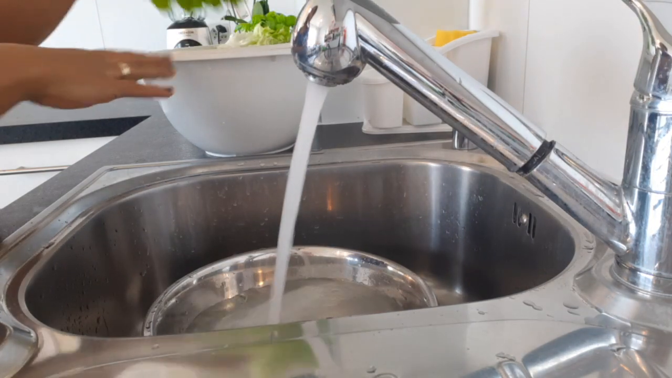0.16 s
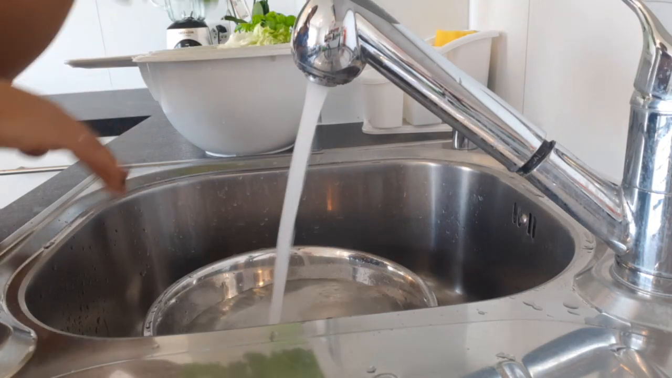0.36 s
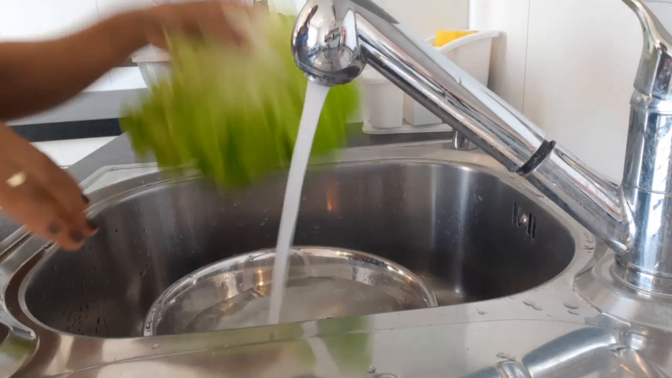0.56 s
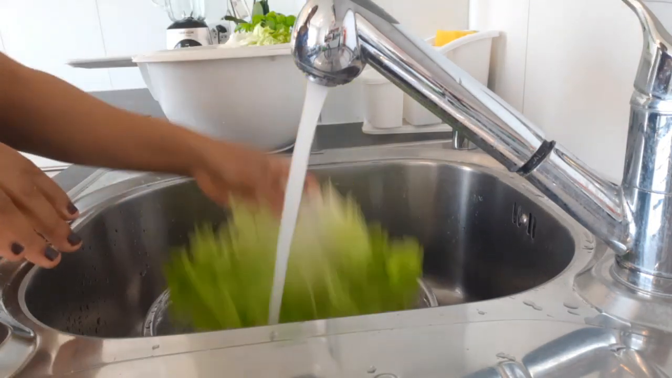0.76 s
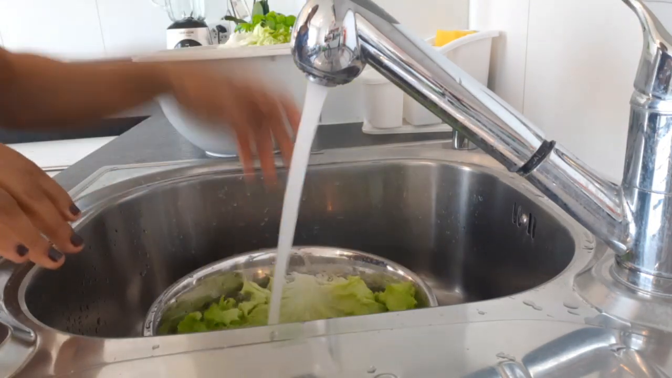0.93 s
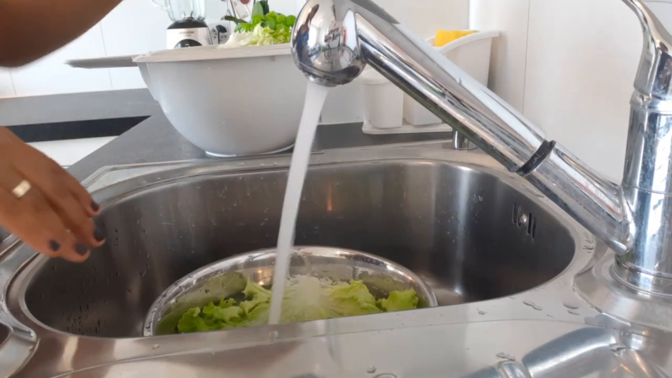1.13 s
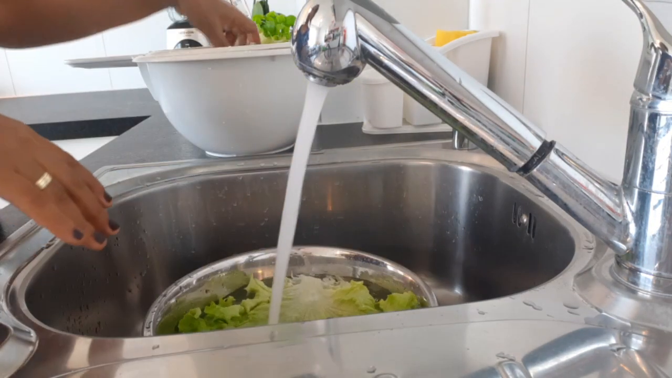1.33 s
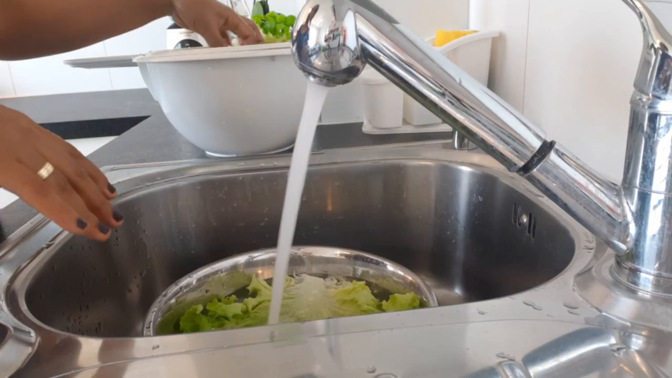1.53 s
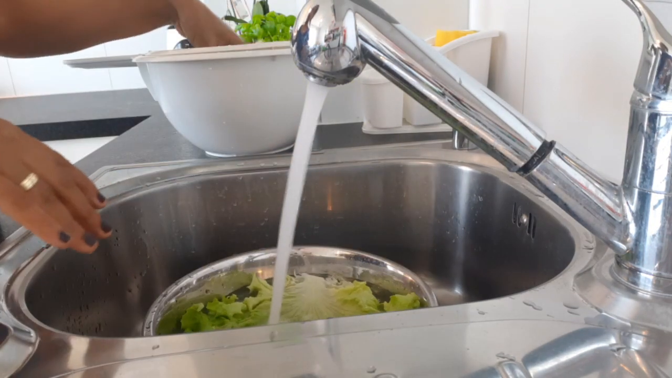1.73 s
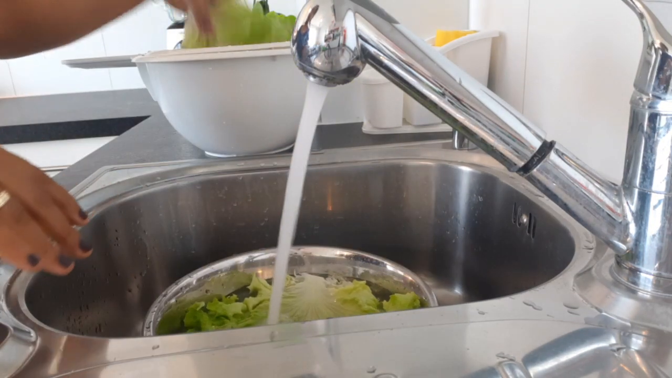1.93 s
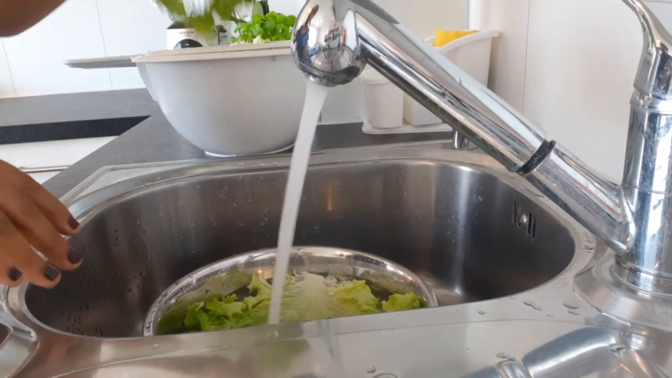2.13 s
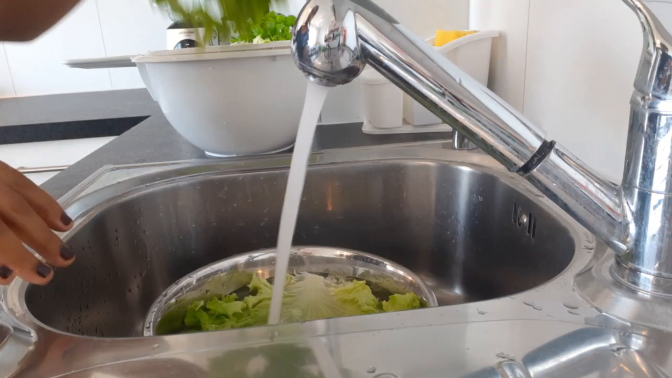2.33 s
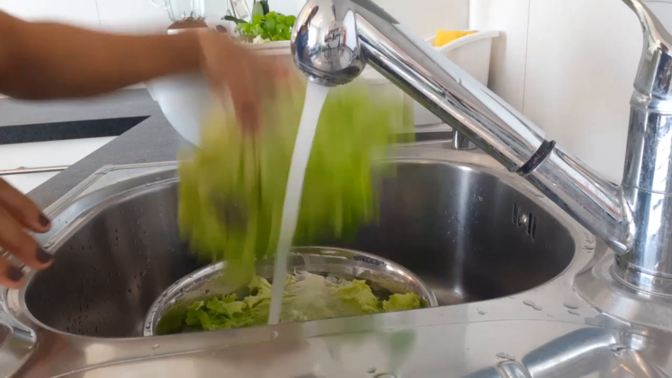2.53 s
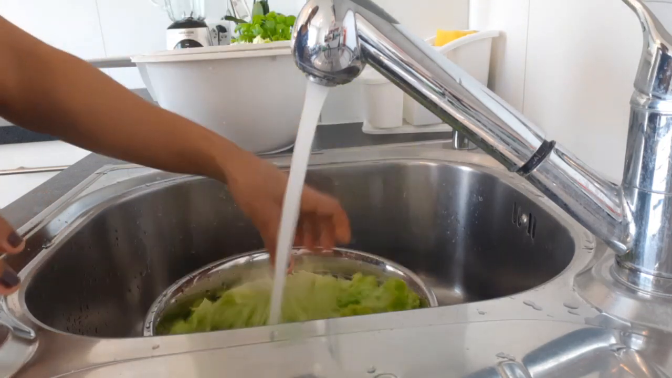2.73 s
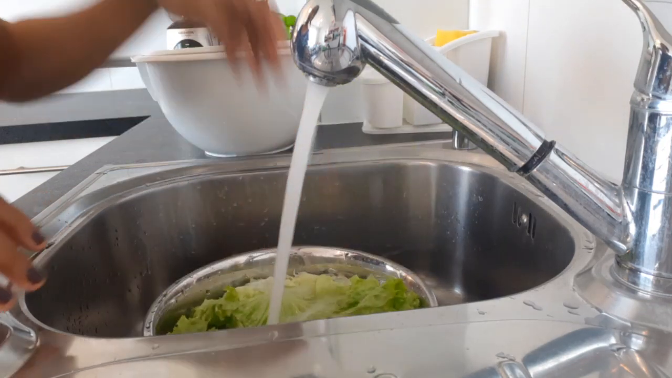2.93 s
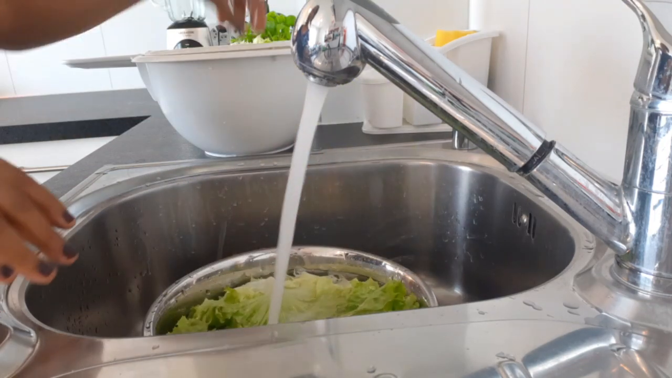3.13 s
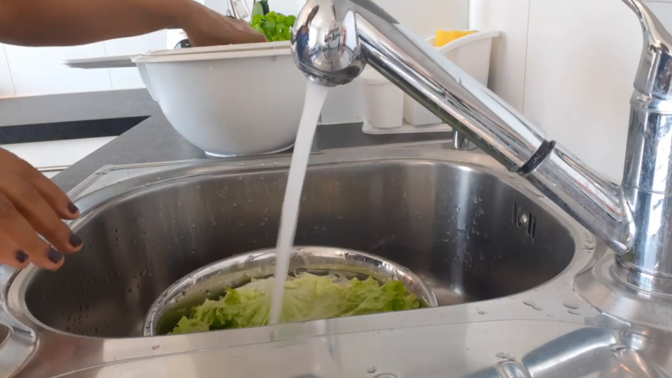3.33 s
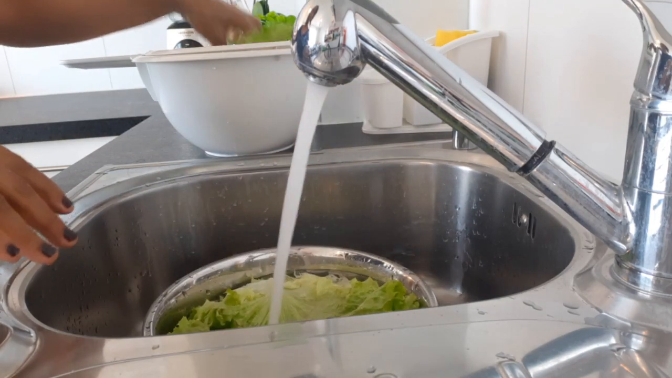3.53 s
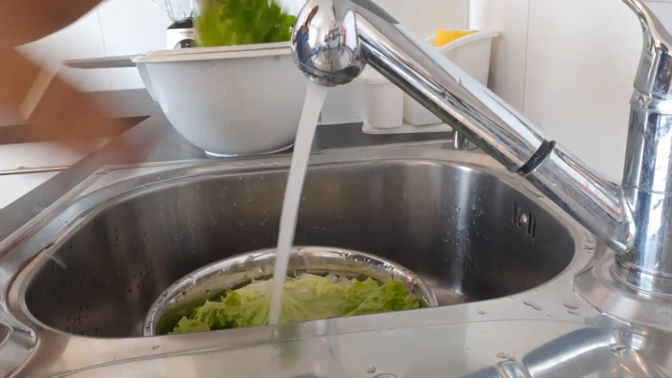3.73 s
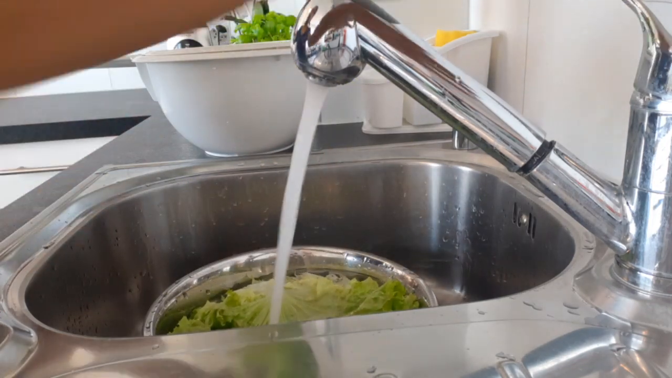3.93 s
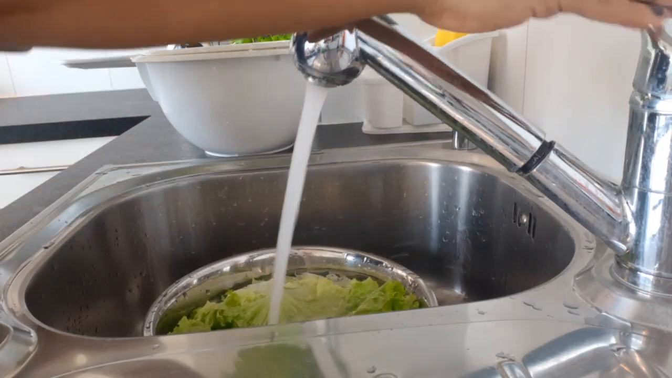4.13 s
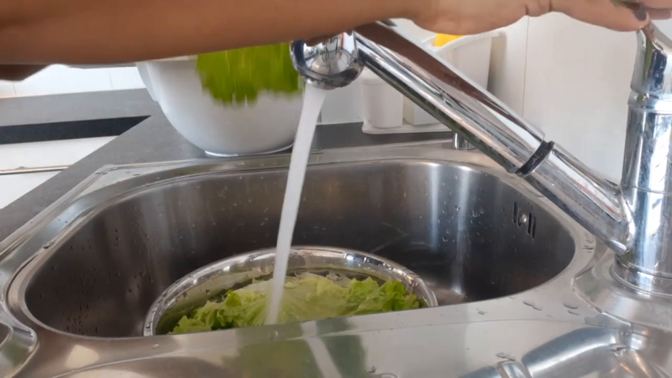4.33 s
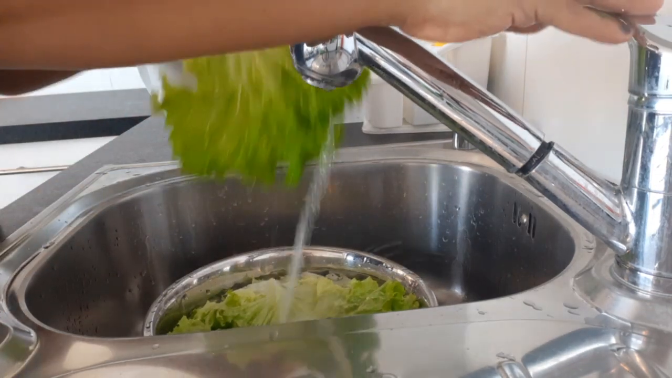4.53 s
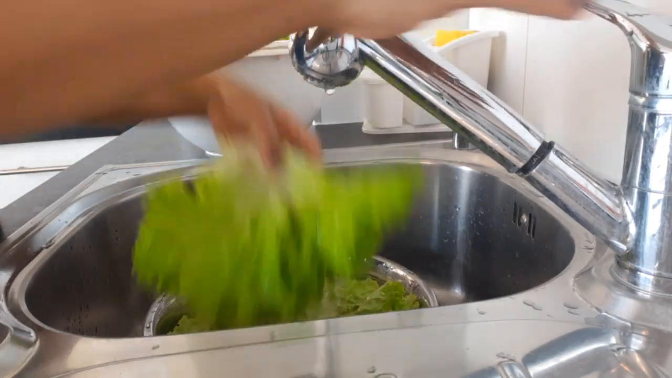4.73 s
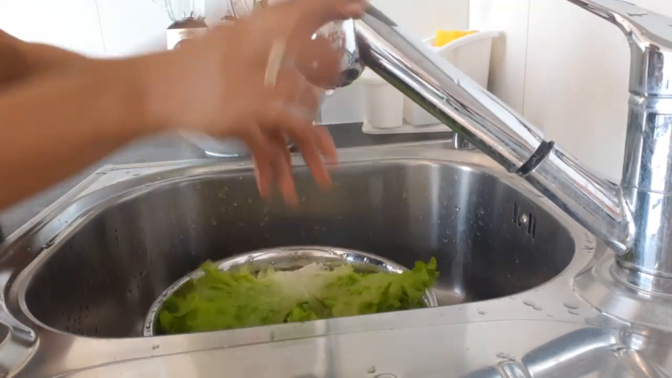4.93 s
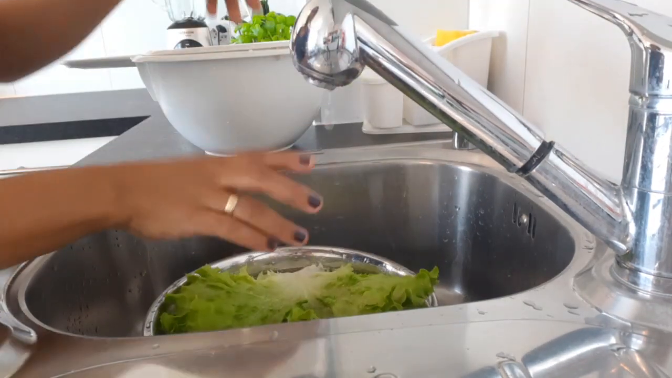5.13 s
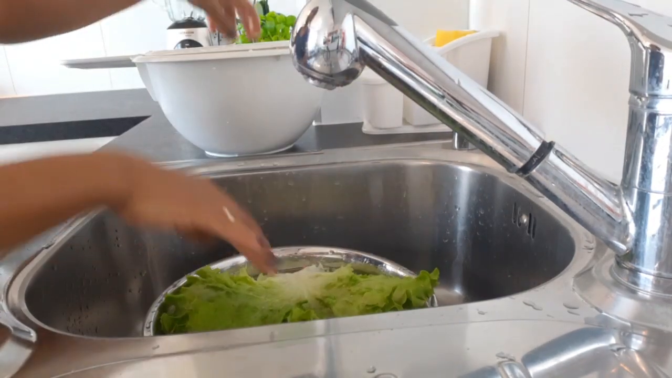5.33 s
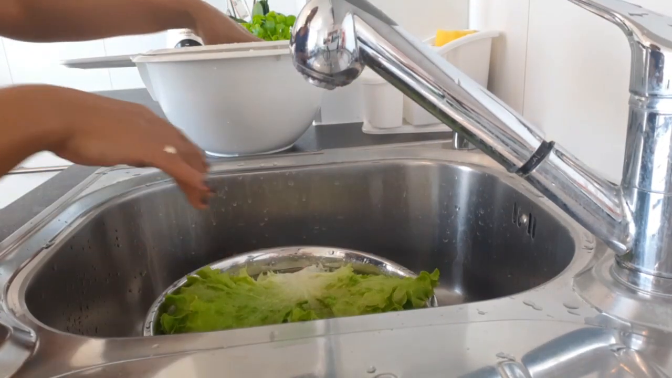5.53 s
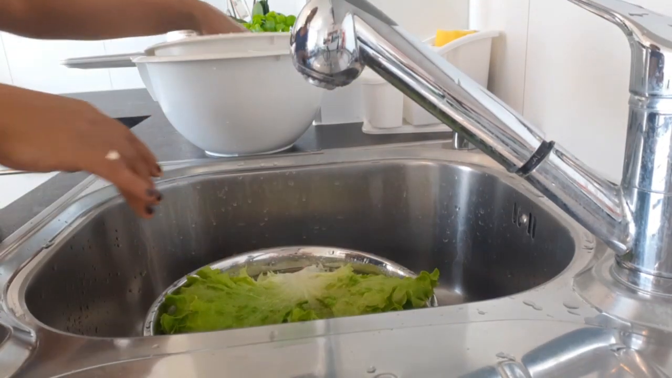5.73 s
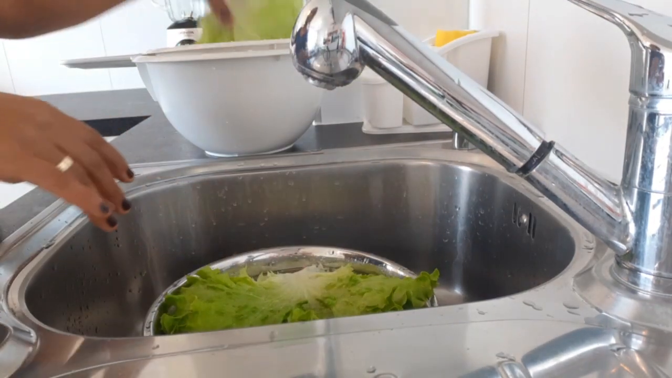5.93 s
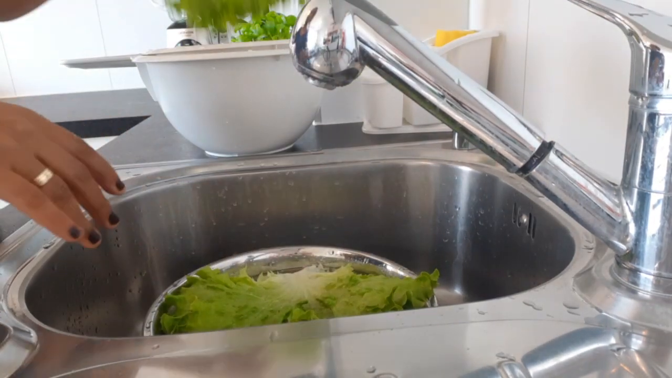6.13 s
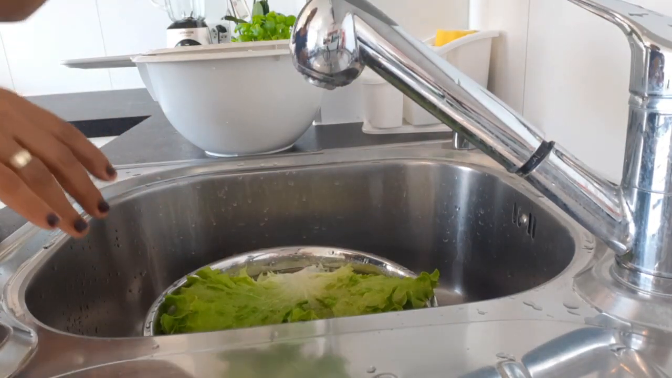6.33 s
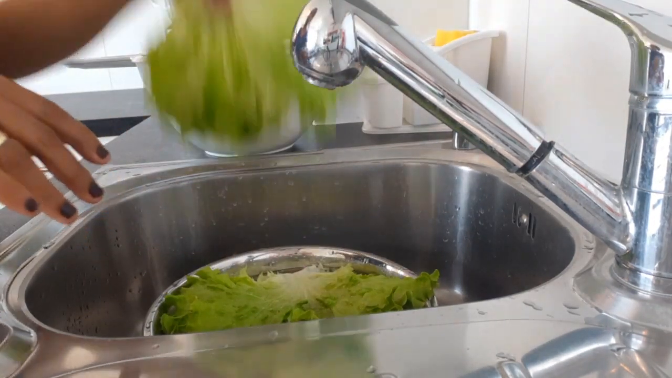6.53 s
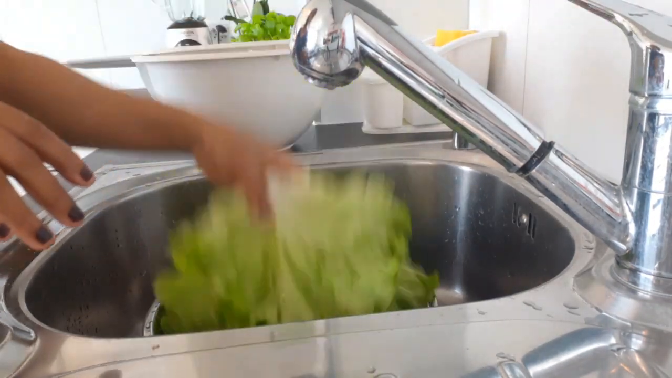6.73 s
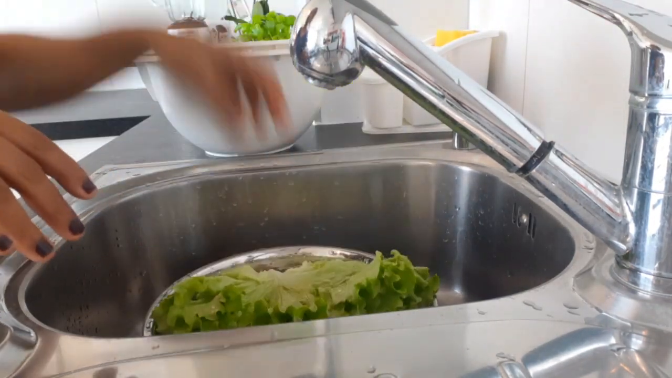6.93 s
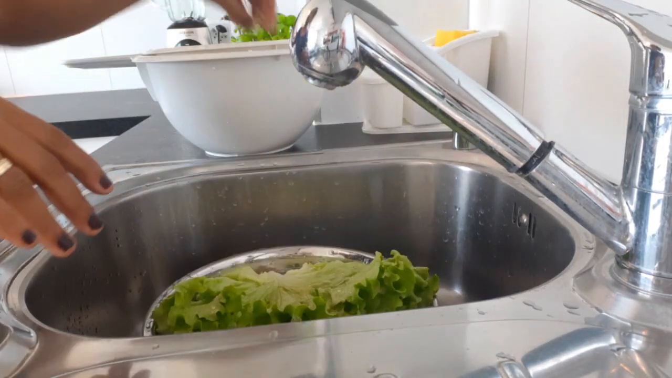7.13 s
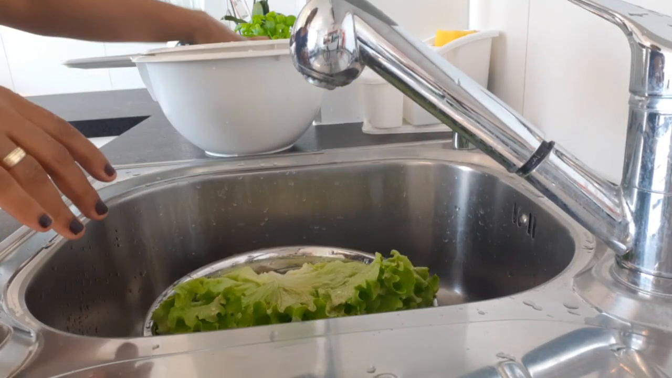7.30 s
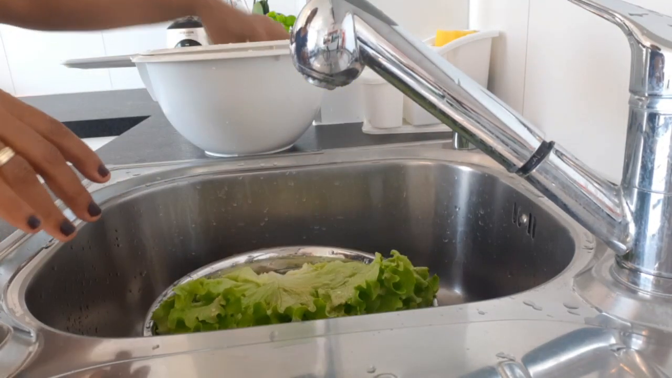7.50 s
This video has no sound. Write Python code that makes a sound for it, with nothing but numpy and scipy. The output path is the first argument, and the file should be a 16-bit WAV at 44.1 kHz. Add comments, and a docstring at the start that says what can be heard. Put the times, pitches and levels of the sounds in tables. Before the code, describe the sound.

Close hissing, gurgling tap water splashes over lettuce and stops with a dull thud, leaving hollow tub knocks and faint leafy crackles.

```python
"""First a tap is heard running hard into a bowl of water in a steel sink, close by: fizz, tinkling and gurgling.
Lettuce is lifted from a plastic tub and dropped under the jet, which then spatters on the leaves.
The lever is pushed shut with a thud; the hand goes on gathering wet leaves and the tub knocks on the worktop.
Water is filtered grains and short rising notes; leaves are crackling grains under swells; blows are ringing
modes and noise bursts. Echoes and a faint room floor lie behind, heard at two microphone ports."""
import sys
import numpy as np
from scipy import signal
from scipy.fft import rfft, irfft
from scipy.io import wavfile

SR = 44100
rng = np.random.default_rng(int(sys.argv[2]) if len(sys.argv) > 2 else 0)


def master_out(mix):
    """Clip the mix to full scale and print it as 16-bit PCM to the path in sys.argv[1]."""
    frames = np.transpose(np.atleast_2d(mix))
    ceiling = np.clip(frames, -1, 1)
    pcm = np.round(ceiling * 32767).astype(np.int16)
    wavfile.write(sys.argv[1], SR, pcm)


N = 337806
TIME = np.arange(N) / SR
COARSE_TIME = TIME[::32]   # slow controls are worked out on every 32nd sample

# All levels in dB are set at the source, before echoes and the microphone.
# where the jet lands: start_s, share_on_leaves (0-1)
JET_LANDING = [(0, 0.26), (.75, 0.17), (.95, 0.76), (1.3, 0.15), (2.62, 0.28), (2.72, 0.58), (2.92, 0.94),
               (4.0, 1)]
# the jet on open water: splash, bubbles, drumming on the basin, hollow note of the bowl (dB)
SPLASH_DB, GURGLE_DB, DRUM_DB, HOLLOW_DB = -38.5, -47, -45, -44
# what changes when it lands wholly on leaves (dB)
LEAF_SPLASH_GAIN_DB, LEAF_DRUM_LOSS_DB, LEAF_HOLLOW_LOSS_DB = 8.5, 5.5, 20.5
FILL_DB_PER_S = 2.5   # the hollow note grows as the bowl fills
WANDER_DB, WANDER_HZ = 0.19, 4.3   # the jet sways over the leaves, and its level with it
# fat drops on the leaves, against the spatter; tinkle, against the fizz; lone bubbles in the pool
PATTER_DB, TINKLE_DB, BLIP_DB = -11.5, -16, -53
# the lever is shut, the jet dies, and water trickles off the leaves
SHUT_S, SHUT_DB_PER_S = 4.53, 156
TRICKLE_DB, TRICKLE_DB_PER_S = -45.5, 48
# leaves shift under the jet and the water sloshes: start_s, length_s, spray_db, bubbles_db
SLOSHES = [(0.144, 0.0076, -54, -43), (0.572, 0.0073, -36.5, -39.5), (0.803, 0.04, -36.5, -55),
           (0.861, 0.12, -33, -44.5), (1.098, 0.094, -34.5, -63), (2.71, 0.082, -39, -43.5),
           (3.396, 0.012, -32, -48.5)]
SLOSH_RISE_DB_PER_S, SLOSH_FALL_DB_PER_S = 496.5, 204.5
# spectrum of the jet on the pool: frequency_hz, level_db (per Hz)
POOL_SPECTRUM = [(1060, -22), (1800, 1.5), (2300, -0.5), (2670, 2), (2900, -4), (4450, -3), (8130, -8),
                 (9420, 0), (13300, -2.5), (16000, -3.5)]
# spectrum of the jet on leaves: frequency_hz, level_db (per Hz)
SPATTER_SPECTRUM = [(1060, -36), (1800, -5), (2220, -9.5), (2600, 1), (3290, -5), (4140, -0.5), (6300, -4),
                    (7910, -5.5), (9770, -1.5), (13000, -4.5), (16000, -9)]
# spectrum of the drumming on the basin: frequency_hz, level_db (per Hz)
DRUM_SPECTRUM = [(30, -4.5), (55, -1.5), (85, -5), (120, -2), (160, 1), (200, 1), (235, -14), (300, -3.5),
                 (400, 2.5), (520, 1.5), (610, -1.5), (730, -4), (1000, -15.5), (1800, -33.5)]
# resonances of the basin that colour the water: frequency_hz, width_hz, level_db
BASIN_RESONANCES = [(114, 10, 11), (385, 32, 3), (618, 25, 6), (950, 16, 4), (1236, 6.9, 3.5),
                    (2725, 66, 2.5), (2850, 45, 0.5), (3120, 70, 6.5), (3490, 45, 6.5), (4050, 41, 1.5),
                    (4420, 100, 2), (4670, 36, 1.5), (5858, 40, -1.5), (6620, 90, 3), (7090, 90, 3)]
# pockets between the leaves, which open and close under the jet: frequency_hz, width_hz
LEAF_POCKETS = [(1200, 580), (2750, 500), (3500, 600), (4400, 800), (5400, 900), (6700, 1200)]
POCKET_SWING_DB, POCKET_HZ = 2, 11
# splashes and snapping leaves: start_s, level_db, pitch_hz
SPITS = [(0.484, -36, 4560), (0.586, -34, 10900), (0.778, -35.5, 4180), (0.795, -34.5, 1140),
         (0.826, -37.5, 1400), (0.875, -36.5, 1370), (0.884, -30, 4510), (0.932, -28, 5200),
         (0.94, -34, 2300), (0.942, -24, 9050), (1.034, -35.5, 4440), (1.1172, -35, 2680),
         (1.188, -35, 2820), (2.0123, -27.5, 9800), (2.293, -30, 9600), (2.677, -30.5, 1800),
         (2.724, -37.5, 1250), (2.751, -40, 1150), (2.878, -28, 6000), (3.023, -31.5, 4940),
         (3.0695, -27, 5240), (3.101, -30.5, 5160), (3.382, -33, 1600), (3.861, -30, 3080),
         (3.953, -28, 2820), (4.5754, -28.5, 4930), (4.785, -64, 1400), (4.868, -47, 1250),
         (4.889, -42, 1300), (4.897, -43.5, 6600), (5.046, -61, 11000), (5.2368, -62, 11200),
         (5.484, -41, 1950), (5.5, -51, 3800), (5.554, -47.5, 3000), (5.642, -47, 2900), (5.692, -48, 1500),
         (5.805, -51, 3500), (6.641, -58.5, 1002), (6.8117, -47, 9500), (6.858, -54, 1200),
         (6.996, -68, 11000), (7.1482, -63, 11440), (7.158, -65, 1400), (7.378, -53, 3900),
         (7.431, -55, 2610), (7.474, -52, 4200), (7.502, -50, 3870), (7.53, -52, 1817)]
# large bubbles and plops: start_s, level_db, pitch_hz
PLOPS = [(0.135, -27, 1230), (0.137, -31, 950), (0.343, -34, 1230), (0.582, -36.5, 1230),
         (0.829, -23.5, 1264), (0.829, -23.5, 1357), (0.873, -26, 1212), (1.033, -29, 1900),
         (1.389, -35, 1390), (5.553, -35, 860), (7.531, -45, 1640)]
# air glugs in the filling bowl: start_s, length_s, pitch_hz, level_db
GLUGS = [(0.06, 0.015, 286.3, -32), (0.09, 0.069, 207, -41), (0.245, 0.043, 614, -41),
         (0.28, 0.05, 290, -39.5), (0.595, 0.061, 279, -42), (0.755, 0.036, 300, -36),
         (0.93, 0.077, 424.4, -37), (1.08, 0.075, 552, -43), (1.365, 0.055, 348, -39)]
TONE_RISE_DB_PER_S, TONE_FALL_DB_PER_S = 904, 399   # glugs and squeaks alike

# the hand gathers leaves in the tub: start_s, length_s, rustle_db, tub_rubbing_db
GRABS = [(0.028, 0.15, -48, -42.5), (1.326, 0.051, -42.5, -40), (1.673, 0.13, -44.5, -40),
         (3.353, 0.32, -45.5, -46.5), (5.486, 0.014, -48.5, -45), (5.553, 0.011, -51.5, -47),
         (5.635, 0.012, -52.5, -41), (5.677, 0.23, -55.5, -48.5), (5.916, 0.14, -65, -44),
         (6.285, 0.12, -85, -61), (7.345, 0.2, -56.5, -55)]
GRAB_RISE_DB_PER_S, RUSTLE_FALL_DB_PER_S, RUB_FALL_DB_PER_S = 596.5, 141, 103
# a handful lands in the steel bowl: start_s, rustle_db, bowl_ring_db
LEAF_DROPS = [(0.829, -37.5, -43), (2.679, -66, -51), (4.909, -47.5, -56), (6.864, -51.5, -85)]
# it brushes the rim first, swells until it lands, then settles
BRUSH_S, BRUSH_SWELL_DB, SETTLE_DB_PER_S, DROP_BODY_DB = 0.14, 9, 272.5, -2.5
SNAP_DB = -4.5   # leaf ribs snap, against the fine crackle
# spectrum of crackling leaves: frequency_hz, level_db (per Hz)
RUSTLE_SPECTRUM = [(470, -29), (750, -10), (900, 2), (1080, -1), (1250, -6), (1950, -4), (2800, -8),
                   (4000, -6.5), (6500, -11.5), (8500, -14.5), (9500, -11), (12000, -15), (16000, -21)]
# resonances of the tub that colour sound inside it: frequency_hz, width_hz, level_db
TUB_RESONANCES = [(867, 33, 4.5), (995, 52, 6), (1615, 31, 5), (2125, 70, 3.5), (2500, 70, 9),
                  (3770, 120, 2.5)]
# resonances of the steel bowl that colour leaves landing in it: frequency_hz, width_hz, level_db
BOWL_RESONANCES = [(1100, 200, 6), (1620, 100, -5.5), (2380, 220, 2), (5740, 150, -0.5), (10320, 400, -3)]
# ringing of the steel bowl: frequency_hz, level_db, t60_s
BOWL_MODES = [(946, -7.5, 1.2), (936, -12, 1.3), (1238, -9, 1.3)]
# wet leaves squeak on the tub: start_s, length_s, pitch_hz, level_db
SQUEAKS = [(5.481, 0.016, 3730, -48), (7.576, 0.0075, 6670, -55)]

# tub on the worktop: start_s, level_db, hardness_db, upper_modes_db
KNOCKS = [(0.06, -35.5, -26, -25), (0.65, -30, 1, -13), (1.685, -23.5, -10, -30), (1.752, -25, -35, -31),
          (1.81, -35, 12, -6), (1.849, -22, -5.5, -17), (4.204, -22, -10, -24), (4.498, -25, -30, -17),
          (4.939, -36, -22, -27), (5.407, -28, -10, -12), (5.436, -34, -13, -10), (5.474, -41, -10, -9),
          (5.639, -31, -0.5, -5), (5.66, -20, -18, -4.5), (5.705, -27.5, -10.5, -20), (5.733, -31, -15, -2),
          (5.778, -25, -13.5, -29), (5.925, -16, -8, -6), (5.938, -38, -6, -3), (5.996, -26, -11, -4.5),
          (6.281, -46, -30, -31), (7.0, -46.5, -7.5, -1.5), (7.33, -41, -14, -26), (7.48, -33.5, -3.5, 4),
          (7.529, -42, -7, -4)]
KNOCK_RING_DB, KNOCK_BODY_DB, KNOCK_CRACK_DB, KNOCK_TICK_DB = -6, -5.5, -12, -8.5
RING_LAG_S = 0.0043   # the rim clicks first; the base meets the worktop this much later
# ringing of tub and worktop, with faint long steel tones at 1410, 1884 and 2342 Hz:
# frequency_hz, level_db, t60_s
KNOCK_MODES = [(114, -19, 0.4), (300, -0.5, 0.2), (375.2, -8.5, 0.26), (415, -9.5, 0.2), (458, -8.5, 0.22),
               (512, -6, 0.2), (554, -11.5, 0.38), (609, -11.5, 0.3), (606, -17.5, 0.15),
               (1020, -18.5, 0.16), (1095, -23.5, 0.2), (1410, -40.5, 1.3), (1630, -24, .13),
               (1884, -36.5, 1), (2120, -27, .14), (2342, -43.5, 1.9)]
# spectrum of the tub's hollow body: frequency_hz, level_db (per Hz)
TUB_BODY_SPECTRUM = [(60, -29), (120, 1), (170, -12.5), (225, -22), (280, -2), (340, -1), (430, -0.5),
                     (590, -8), (720, -21.5), (1100, -26), (2500, -55.5)]
# spectrum of the crack of a knock: frequency_hz, level_db (per Hz)
TUB_CRACK_SPECTRUM = [(500, -28.5), (800, 1.5), (1050, 4), (1280, -1), (1700, 1), (2400, -10), (4000, -19),
                      (8000, -34.5), (16000, -50)]
# hand and arm on the tap and the sink: start_s, level_db
THUDS = [(0.847, -35), (1.754, -33.5), (1.842, -30.5), (4.149, -27.5), (4.203, -20), (4.475, -16),
         (4.507, -20.5), (4.545, -22), (4.669, -34.5), (4.941, -28.5), (5.065, -40), (5.519, -36),
         (5.694, -28), (6.868, -49), (7.494, -41)]
THUD_RING_DB, THUD_BUMP_DB = -7.5, -5
# ringing of the sink: frequency_hz, level_db, t60_s
SINK_MODES = [(57, -13, 0.42), (87, -7.5, 0.36), (117, -4, 0.32), (121, 5, 0.47), (138, -1, 0.17),
              (160, -12, 0.16), (178, -10, 0.24), (297, -4.5, 0.5)]
# groans of the tub dragging: start_s, length_s, pitch_hz, level_db
DRAGS = [(1.335, 0.015, 415, -19.5), (3.234, 0.19, 83.6, -37.5), (3.701, 0.14, 79.5, -34.5)]

# spectrum of the room floor: frequency_hz, level_db (per Hz)
ROOM_SPECTRUM = [(18, -35), (45, 6.5), (70, -11.5), (125, 0), (200, -9.5), (400, -9), (700, -18),
                 (1800, -28.5), (2450, -29.5), (4000, -32.5), (8700, -42.5), (9400, -34), (16000, -34)]
ROOM_DB = -65.5
# colour of the echoes and of the difference between the two microphone ports: frequency_hz, level_db
WIDTH_SPECTRUM = [(60, -9), (120, -10), (350, -6.5), (700, -4.5), (1300, 2.5), (2400, 2), (16000, 3.5)]
# left port against right port: frequency_hz, level_db
LEFT_OVER_RIGHT = [(60, -3.5), (200, -3.5), (400, -1), (1300, -2.4), (2400, -3.5), (4400, -1.6), (8000, -3),
                   (16000, -7)]
TUB_LEFT_SHARE = 0.15   # the tub stands to the left of the sink
WATER_ECHO_SHARE = 0.36
RING_ECHO_SHARE = 0.35   # ringing tub and steel are close by and come mostly direct
CUTOFF_HZ = 15900


def water():
    """The jet fizzes and tinkles in the pool or spatters on leaves, drags bubbles under and drums on the basin."""
    on_leaves = np.clip(np.interp(TIME, *np.transpose(JET_LANDING)), 0, 1)
    on_pool = np.sqrt(1 - on_leaves)
    since_shut = np.maximum(TIME - SHUT_S, 0)
    flow = from_db(-SHUT_DB_PER_S * since_shut)
    trickle = (1 - flow) * from_db(TRICKLE_DB - TRICKLE_DB_PER_S * since_shut)
    s, length, spray_db, bubble_db = np.transpose(SLOSHES)
    spray = swells(s, length, spray_db, SLOSH_RISE_DB_PER_S, SLOSH_FALL_DB_PER_S)
    churn = swells(s, length, bubble_db, SLOSH_RISE_DB_PER_S, SLOSH_FALL_DB_PER_S)

    jet = flow * from_db(SPLASH_DB + LEAF_SPLASH_GAIN_DB * on_leaves + WANDER_DB * drift(WANDER_HZ))
    splash = np.hypot(jet * on_pool, spray + trickle) * pool_fizz()
    tinkle = from_db(TINKLE_DB) * drops(per_s=120, cycles=81, low_hz=1766, high_hz=6260, rise=0.055,
                                        spread_db=6, tilt_db=19)
    splash += jet * (np.sqrt(on_leaves) * leaf_spatter() + tinkle)

    bubbles = drops(per_s=650, cycles=33, low_hz=892, high_hz=1653, rise=0.049, spread_db=1.5, tilt_db=6)
    gurgle = np.hypot(flow * from_db(GURGLE_DB), churn) * bubbles
    blips = drops(per_s=28, cycles=64, low_hz=938, high_hz=2770, rise=0.062, spread_db=10)
    gurgle += flow * on_pool * from_db(BLIP_DB) * blips

    drumming = grains(per_s=2500, spread_db=-0.5, clump_db=1.44, clump_rate=15)
    drum = from_db(DRUM_DB - LEAF_DRUM_LOSS_DB * on_leaves) * rms_one(colour(drumming, DRUM_SPECTRUM))
    hollow_db = HOLLOW_DB + FILL_DB_PER_S * TIME - LEAF_HOLLOW_LOSS_DB * on_leaves
    air = resonate(rng.standard_normal(N), hz=296.2, width=14)
    hollow = from_db(hollow_db) * rms_one(resonate(air, hz=300, width=240))
    return peaked(splash + gurgle + flow * (drum + hollow), BASIN_RESONANCES)


def pool_fizz():
    """Dense tiny impacts on open water, in uneven surges."""
    impacts = grains(per_s=7000, spread_db=1.5, clump_db=1.32, clump_rate=36)
    return rms_one(colour(impacts, POOL_SPECTRUM)) * surges(per_s=13, size=.35, t60=0.026)


def leaf_spatter():
    """Denser impacts on leaves with fat drops among them, coloured by the pockets between the leaves."""
    impacts = grains(per_s=12000, spread_db=1.5, clump_db=1.47, clump_rate=44)
    spatter = rms_one(colour(impacts, SPATTER_SPECTRUM)) * surges(per_s=24, size=.4, t60=0.029)
    patter = drops(per_s=190, cycles=76, low_hz=3326, high_hz=6760, rise=0.1, spread_db=9.5)
    return fluttering(spatter + from_db(PATTER_DB) * patter)


def fluttering(x):
    """Each pocket between the leaves swells and fades by itself, so the colour keeps shifting; rms 1."""
    shifting = x
    for hz, width in LEAF_POCKETS:
        gain = from_db(POCKET_SWING_DB * drift(POCKET_HZ))
        shifting = shifting + (gain - 1) * resonate(x, hz, width)
    return rms_one(shifting)


def spits(t60, breadth, size=8192):
    """Splashes and leaf snaps: short dying noise bursts, each in a broad band round its pitch."""
    out, t = np.zeros(N + size), np.arange(size) / SR
    for s, db, hz in SPITS:
        edges = [hz / (1 + breadth), min(hz * (1 + breadth), .45 * SR)]
        band = signal.butter(2, edges, "band", fs=SR, output="sos")
        noise = rms_one(signal.sosfilt(band, rng.standard_normal(size)))
        out[int(s * SR):][:size] += from_db(db - 60 * t / t60) * noise
    return out[:N]


def plops(t60, rise, size=8192):
    """Large bubbles ring and rise in pitch."""
    out, t = np.zeros(N + size), np.arange(size) / SR
    for s, db, hz in PLOPS:
        out[int(s * SR):][:size] += from_db(db - 60 * t / t60) * np.sin(2 * np.pi * hz * t * (1 + rise * t))
    return out[:N]


def rough_tones(rows, waver, waver_hz, glide_per_s):
    """Glugs or squeaks: short notes whose pitch slides and wavers."""
    out, wobble = np.zeros(N), waver * drift(waver_hz)
    for s, length, hz, db in rows:
        near = abs(TIME - s) < length + .2   # each note is worked out only near its own time
        pitch = hz * (1 + wobble[near] + glide_per_s * (TIME[near] - s - length / 2))
        gain = swells([s], [length], [db], TONE_RISE_DB_PER_S, TONE_FALL_DB_PER_S)[near]
        out[near] += gain * np.sin(2 * np.pi * np.cumsum(pitch) / SR)
    return out


def leaves():
    """Wet leaves crackle and snap as the hand rubs round the tub and as they land in the bowl."""
    s, length, rustle_db, rub_db = np.transpose(GRABS)
    gathering = swells(s, length, rustle_db, GRAB_RISE_DB_PER_S, RUSTLE_FALL_DB_PER_S)
    rubbing = swells(s, length, rub_db, GRAB_RISE_DB_PER_S, RUB_FALL_DB_PER_S)
    s, drop_db, _ = np.transpose(LEAF_DROPS)
    landing = swells(s - BRUSH_S, np.full(len(s), BRUSH_S), drop_db, GRAB_RISE_DB_PER_S, SETTLE_DB_PER_S,
                     BRUSH_SWELL_DB)

    fine = rms_one(colour(grains(per_s=850, spread_db=1.5, clump_db=3.5, clump_rate=32), RUSTLE_SPECTRUM))
    snaps = drops(per_s=130, cycles=44, low_hz=1020, high_hz=6000, rise=0, spread_db=10)
    crackle = rms_one(fine * surges(per_s=87, size=.5, t60=0.024) + from_db(SNAP_DB) * snaps)
    rub_grains = grains(per_s=830, spread_db=3, clump_db=2.5, clump_rate=24)
    rub = (rubbing + from_db(DROP_BODY_DB) * landing) * rms_one(colour(rub_grains, TUB_BODY_SPECTRUM))
    return peaked(gathering * crackle, TUB_RESONANCES) + peaked(landing * crackle, BOWL_RESONANCES) + rub


def bowl_ring():
    """The steel bowl sings on faintly after leaves land on its rim."""
    s, _, db = np.transpose(LEAF_DROPS)
    return sum(ring(strikes(s, db + level), hz, t60) for hz, level, t60 in BOWL_MODES)


def knock_ring():
    """Each knock rings tub, worktop and faint long steel tones; where it lands sets the upper modes' share."""
    s, db, _, upper_db = np.transpose(KNOCKS)
    out = np.zeros(N)
    for hz, level, t60 in KNOCK_MODES:
        force_db = db + level + KNOCK_RING_DB + rng.normal(0, 1.8, len(s))
        if hz > 430:
            force_db = force_db + upper_db + 7.5
        out += ring(strikes(s + RING_LAG_S, force_db), hz, t60)
    return out


def clatter():
    """Dense, quickly dying modes: the first tick, the crack and the hollow body of a knock."""
    s, db, hard_db, _ = np.transpose(KNOCKS)
    body = dying(strikes(s + RING_LAG_S, db + KNOCK_BODY_DB), t60=0.1)
    crack = dying(strikes(s, db + hard_db + KNOCK_CRACK_DB), t60=0.17)
    tick = dying(strikes(s, db + hard_db + KNOCK_TICK_DB), t60=0.007)
    hollow = bursts(TUB_BODY_SPECTRUM, soften(body, contact_s=0.00056))
    sharp = bursts(TUB_CRACK_SPECTRUM, soften(crack + tick, contact_s=0.0006))
    return hollow + peaked(sharp, TUB_RESONANCES)


def sink_thuds():
    """Soft blows of hand and arm set the modes of the steel sink booming."""
    s, db = np.transpose(THUDS)
    out = np.zeros(N)
    for hz, level, t60 in SINK_MODES:
        force_db = db + level + THUD_RING_DB + rng.normal(0, 1, len(s))
        out += ring(soften(strikes(s, force_db), contact_s=0.0008), hz, t60)
    return out


def bumps():
    """The dull, quickly dying part of each thud."""
    s, db = np.transpose(THUDS)
    dull = [(35, -27.5), (80, -7.5), (125, 6.5), (190, -16), (300, -11), (900, -54)]   # frequency_hz, level_db
    return bursts(dull, soften(dying(strikes(s, db + THUD_BUMP_DB), t60=0.2), contact_s=0.0023))


def drag_groans():
    """A dragged tub groans briefly: a swelling sine of wavering pitch."""
    out = np.zeros(N)
    for start, length, hz, level in DRAGS:
        swell = np.sin(np.pi * np.clip((TIME - start) / length, 0, 1))
        phase = 2 * np.pi * np.cumsum(hz * (1 + 0.064 * drift(21))) / SR
        out += from_db(level) * swell * np.sin(phase)
    return out


def scattered():
    """All that sounds from many points of the sink and tub at once: (in the sink, in the tub)."""
    return water() + spits(t60=0.074, breadth=0.34), leaves() + clatter()


def reflections(basin_t60, kitchen_t60, kitchen_db, size=22050):
    """Quick echoes between the steel walls, then the kitchen's tail; unit energy."""
    t = np.arange(size) / SR
    envelope = from_db(-60 * t / basin_t60) + from_db(kitchen_db - 60 * t / kitchen_t60)
    echoes = rng.standard_normal(size) * envelope
    return echoes / np.sqrt(np.sum(echoes ** 2))


def room_floor(shared):
    """Steady room noise, partly shared between the two ports; rms 1."""
    return rms_one(colour(shared + 1.1 * rng.standard_normal(N), ROOM_SPECTRUM))


def from_db(db):
    """Gain of a level in dB."""
    return 10 ** (np.asarray(db) / 20)


def rms_one(x):
    """Scale to rms 1."""
    return x / np.sqrt(np.mean(x ** 2) + 1e-20)


def through(x, response):
    """Convolve with a response, keeping the length."""
    return signal.oaconvolve(x, response)[:len(x)]


def colour(x, points, size=4096):
    """Causal, minimum-phase filter with the gains of a spectrum."""
    hz, db = np.transpose(points)
    grid = np.maximum(np.arange(size // 2 + 1) * SR / size, 1)
    cepstrum = irfft(np.log(from_db(np.interp(np.log(grid), np.log(hz), db))))
    cepstrum[1:size // 2] *= 2   # folding the cepstrum gives minimum phase
    cepstrum[size // 2 + 1:] = 0
    return through(x, irfft(np.exp(rfft(cepstrum))))


def resonate(x, hz, width):
    """Band-pass with gain 1 on top."""
    r = np.exp(-np.pi * width / SR)
    feedback = [1, -2 * r * np.cos(2 * np.pi * hz / SR), r * r]
    return signal.lfilter(np.array([1, 0, -1]) * (1 - r * r) / 2, feedback, x + 1e-18)


def peaked(x, resonances):
    """Sound inside a vessel: its resonances are raised, or cut where their level is negative."""
    return x + sum((from_db(db) - 1) * resonate(x, hz, width) for hz, width, db in resonances)


def drift(rate):
    """Slow random wander with spread 1, free of motion below 2 Hz."""
    size = len(COARSE_TIME)
    hz = np.arange(size // 2 + 1) * SR / N
    wander = rfft(rng.standard_normal(size)) / (1 + (hz / rate) ** 2) * (hz > 2)
    return np.interp(TIME, COARSE_TIME, rms_one(irfft(wander, size)))


def swells(starts, lengths, levels_db, rise_db_per_s, fall_db_per_s, growth_db=0):
    """Gain of gestures that rise, hold (growing to their level) and die away."""
    power, t = 0, COARSE_TIME
    for start, length, db in zip(starts, lengths, levels_db):
        early, late = np.maximum(start - t, 0), np.maximum(t - start - length, 0)
        to_come = np.clip((start + length - t) / length, 0, 1)
        gain_db = db - rise_db_per_s * early - fall_db_per_s * late - growth_db * to_come
        power = power + from_db(gain_db) ** 2
    return np.interp(TIME, COARSE_TIME, np.sqrt(power + 1e-20))


def surges(per_s, size, t60):
    """Gain with sudden, uneven surges that die away; rms 1."""
    onsets = (rng.random(N) < per_s / SR) * size * np.minimum(rng.exponential(1, N), 3)
    return rms_one(1 + dying(onsets, t60))


def grains(per_s, spread_db, clump_db, clump_rate):
    """Tiny impacts of uneven size whose level wanders, so that they seem to clump."""
    born = rng.random(N) < per_s / SR
    db = spread_db * np.minimum(rng.exponential(1, N), 4) + clump_db * drift(clump_rate)
    out = np.zeros(N)
    out[born] = from_db(db[born]) * np.sign(rng.random(N)[born] - .5)
    return out


def drops(per_s, cycles, low_hz, high_hz, rise, spread_db, tilt_db=0):
    """Separate dying notes, each with its own size and a pitch that climbs by the rise; rms 1."""
    out = np.zeros(N + SR)
    for when, pitch, size in rng.random((int(per_s * N / SR), 3)):
        hz = low_hz * (high_hz / low_hz) ** pitch
        age = np.linspace(0, 1, int(cycles / hz * SR))
        gain = from_db(spread_db * size ** 2 + tilt_db * pitch - 60 * age)
        out[int(when * N):][:len(age)] += gain * np.sin(2 * np.pi * cycles * age * (1 + rise * age))
    return rms_one(out[:N])


def strikes(times, db):
    """One click for each blow."""
    out = np.zeros(N)
    np.add.at(out, (np.asarray(times) * SR).astype(int), from_db(db))
    return out


def soften(x, contact_s):
    """A soft contact spreads a blow over a moment."""
    r = np.exp(-1 / (contact_s * SR))
    return signal.lfilter([(1 - r) ** 2], [1, -2 * r, r * r], x + 1e-18)


def ring(clicks, hz, t60):
    """A unit click sets a sine of height 1 ringing and dying."""
    r = from_db(-60 / (t60 * SR))
    w = 2 * np.pi * min(hz, SR / 2 - 1) / SR
    return signal.lfilter([0, np.sin(w)], [1, -2 * r * np.cos(w), r * r], clicks + 1e-18)


def dying(clicks, t60):
    """Envelope that jumps at each click and dies away."""
    return signal.lfilter([1], [1, -from_db(-60 / (t60 * SR))], clicks + 1e-18)


def bursts(spectrum, envelope):
    """Noise under an envelope, then through a body that keeps its loudness."""
    white = rng.standard_normal(N)
    return colour(white * envelope, spectrum) / np.std(colour(white, spectrum))


def scene():
    """Bass comes much alike to both ports, treble is diffuse; the right port is favoured, the tub leans left."""
    in_sink, in_tub = scattered()
    sink_side, tub_side = scattered()   # a second, independent draw makes the width
    squeaking = rough_tones(SQUEAKS, waver=0.057, waver_hz=500, glide_per_s=-0.41)
    knocking = soften(knock_ring(), contact_s=0.0001) + squeaking
    glugging = rough_tones(GLUGS, waver=0.064, waver_hz=70, glide_per_s=0.65)
    ringing = knocking + bowl_ring() + sink_thuds() + drag_groans()
    mid = in_tub + bumps() + plops(t60=0.046, rise=2.1) + glugging

    near_walls = reflections(basin_t60=0.013, kitchen_t60=0.21, kitchen_db=-28.5)
    off_walls = through(colour(mid + ringing + WATER_ECHO_SHARE * in_sink, WIDTH_SPECTRUM), near_walls)
    side = colour(0.5 * tub_side + 0.32 * off_walls, WIDTH_SPECTRUM) + TUB_LEFT_SHARE * (in_tub + knocking)
    spread = 0.71 * colour(sink_side, WIDTH_SPECTRUM)
    hush, ports = rng.standard_normal(N), []
    for sign in (1, -1):   # left, right
        struck, wet = mid + sign * side, in_sink + sign * spread
        to_room = colour(struck + RING_ECHO_SHARE * ringing + WATER_ECHO_SHARE * wet, WIDTH_SPECTRUM)
        echo = through(to_room, reflections(basin_t60=0.069, kitchen_t60=0.34, kitchen_db=-13))
        balance = np.array(LEFT_OVER_RIGHT) * [1, sign / 2]   # half the difference to each port
        heard = colour(0.78 * (struck + ringing + wet) + 0.61 * echo, balance)
        ports.append(heard + from_db(ROOM_DB) * room_floor(hush))
    return np.array(ports)


def record(dry):
    """The microphone loses the deepest bass; the top is cut steeply."""
    thin = signal.sosfilt(signal.butter(4, 42, "high", fs=SR, output="sos"), dry)
    return signal.sosfilt(signal.ellip(12, .1, 80, CUTOFF_HZ, fs=SR, output="sos"), thin)


dry = scene()
out = record(dry)
master_out(out)
```